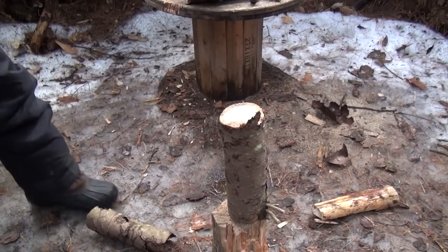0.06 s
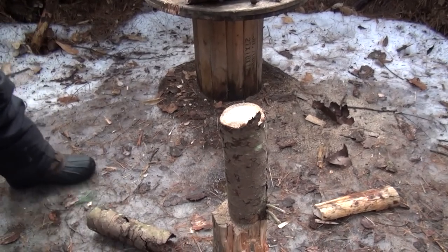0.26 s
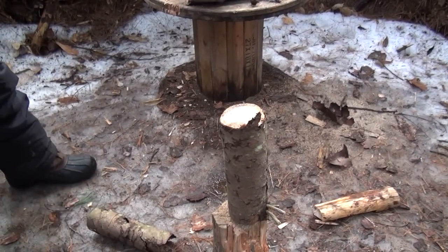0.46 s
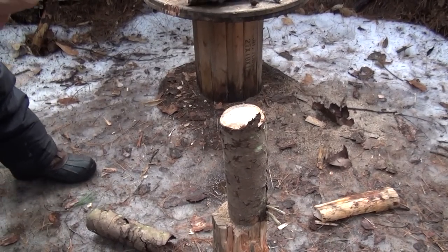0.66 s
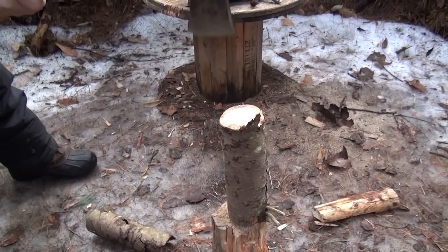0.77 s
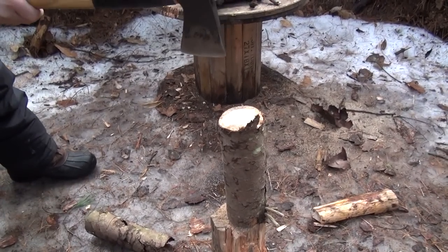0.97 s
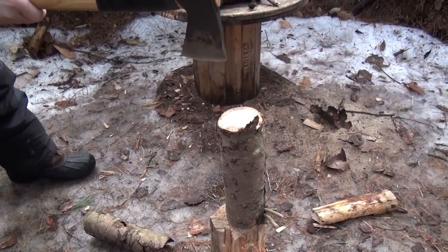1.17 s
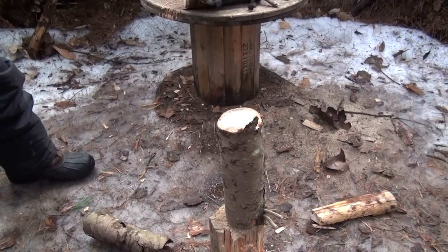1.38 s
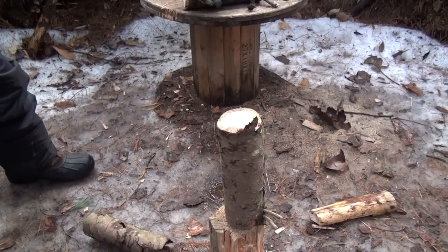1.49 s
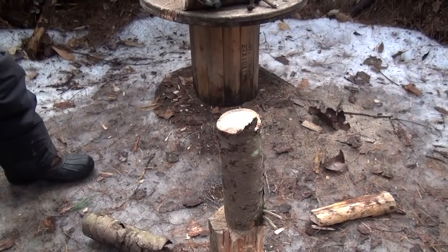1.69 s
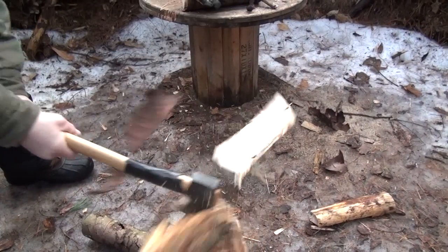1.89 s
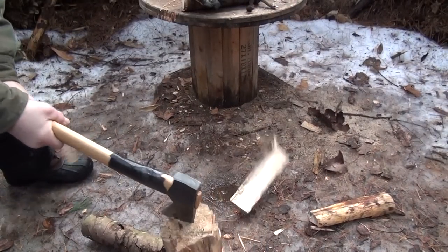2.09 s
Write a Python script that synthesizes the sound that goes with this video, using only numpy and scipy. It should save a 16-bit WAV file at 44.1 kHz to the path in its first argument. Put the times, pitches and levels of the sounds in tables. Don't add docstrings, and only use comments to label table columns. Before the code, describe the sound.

An axe splits a small log with one sharp woody crack after boots shuffle on gritty ground

```python
import sys
import numpy as np
from scipy import signal
from scipy.io import wavfile

SR = 44100
rng = np.random.default_rng(int(sys.argv[2]) if len(sys.argv) > 2 else 0)


def generate_wav(sig):
    pcm = np.round(np.clip(np.atleast_2d(sig).T, -1, 1) * 32767).astype(np.int16)
    wavfile.write(sys.argv[1], SR, pcm)


def linear_from_db(decibels):
    return 10 ** (np.asarray(decibels, float) / 20)


N = 94770
T = np.arange(N) / SR

# frequency in Hz, density in dB per Hz.
GRIT_COLOUR = [(88, -17.5), (150, -13), (649, -7), (900, -8), (1140, -5.5), (2310, -10.5), (8800, -13.5),
               (10800, -19.5), (16000, -21)]


def rms_one(x):
    return x / np.sqrt(np.mean(x ** 2) + 1e-20)


def at_hz(points, hz):
    f, db = np.transpose(points)
    return np.interp(np.log(hz), np.log(f), db) - 12 * np.log2(np.maximum(f[0] / hz, 1))


def drift(rate_hz):
    r = np.exp(-2 * np.pi * rate_hz * 40 / SR)
    slow = signal.lfilter([1], [1, -2 * r, r * r], rng.standard_normal(N // 40 + 2002))[2000:]
    return np.interp(np.arange(N) / 40, np.arange(len(slow)), rms_one(slow))


def bandpass(x, low_hz, high_hz, order=2):
    return signal.sosfilt(signal.butter(order, [low_hz, high_hz], "band", fs=SR, output="sos"), x)


def ring(clicks, hz, t60):
    r = linear_from_db(-60 / (t60 * SR))
    w = 2 * np.pi * hz / SR
    return signal.lfilter([0, np.sin(w)], [1, -2 * r * np.cos(w), r * r], clicks + 1e-18)


def grains(per_s, spread_db, smooth):
    sizes = linear_from_db(spread_db * np.minimum(rng.exponential(1, N), 5)) * rng.choice([-1, 1], N)
    clicks = rms_one(sizes * (rng.random(N) < per_s / SR))
    return rms_one(clicks + smooth * rng.standard_normal(N))


def texture(spectrum, level, tilt_db, patchy_db, *grain):
    sources = [grains(*grain), grains(*grain)]
    both, own = drift(33), drift(16)
    out, power = 0, 0
    for k, hz in enumerate(30 * 2 ** np.arange(0, 9.1, 1 / 3)):
        gain = linear_from_db(at_hz(spectrum, hz))
        power += gain ** 2 * hz * .25 / (SR / 2)
        own = np.roll(own, 3301)
        flicker_db = patchy_db * (.4 * both + 1.33 * own)
        driven = sources[k % 2] * level * linear_from_db(tilt_db * np.log2(hz / 2000) + flicker_db)
        out = out + gain * bandpass(driven, hz / 1.13, hz * 1.13)
    return out / np.sqrt(power)


def strokes(rows, rise_db, fall_db_per_s):
    brightens = 0.054
    level, tilt = np.full(N, 1e-9), np.zeros(N)
    for start, rise, hold, db, bright in rows:
        swell_db = -rise_db * np.clip(1 - (T - start) / rise, 0, 1)
        shape_db = swell_db - fall_db_per_s * np.maximum(T - start - rise - hold, 0)
        gain = linear_from_db(db + shape_db) * np.clip((T - start) / .001, 0, 1)
        level = level + gain
        tilt = tilt + gain * (bright + brightens * np.maximum(shape_db, -30))
    return level, tilt / level


def hits(rows, crack_db, partners, rise_cycles, rough):
    out = np.zeros(N + SR)
    size = SR // 2
    t = np.arange(size) / SR
    draws, noise = rng.random((len(rows), 6)), rng.standard_normal((len(rows), 600))
    for (start, db, hz, t60), d, puff in zip(rows, draws, noise):
        steps = np.arange(len(puff))
        wobble = rough * np.interp(t * hz / 1.3, steps, puff)
        uneven_db = 4.0 * np.interp(t * hz / 1.5, steps, rough * puff[::-1])
        hit = np.sin(2 * np.pi * hz * t + wobble - wobble[0]) * linear_from_db(-60 * t / t60 + uneven_db)
        for ratio, share in zip(0.52 + 1.13 * d[:3], d[3:]):
            partner = np.sin(2 * np.pi * min(hz * ratio, 12000) * t)
            hit += partners * share * partner * linear_from_db(-120 * t / t60)
        crack = bandpass(puff, hz / 2.5, min(hz * 3.5, 14000))
        hit[:600] += linear_from_db(crack_db) * crack * np.exp(-t[:600] * hz / 1.4)
        i = int(start * SR)
        out[i:i + size] += linear_from_db(db) * hit * np.clip(t * hz / rise_cycles, 0, 1)
    return out[:N]


def scatter(x, t60, dull_hz):
    t = np.arange(int(.3 * SR)) / SR
    noise = signal.lfilter([1], [1, -np.exp(-2 * np.pi * dull_hz / SR)], rng.standard_normal(len(t)))
    tail = noise * linear_from_db(-60 * t / t60)
    return signal.fftconvolve(x, tail / np.sqrt(np.sum(tail ** 2)))[:N]


def air():
    # frequency in Hz, density in dB per Hz.
    air_colour = [(15, -53), (25, 7.5), (87, -4), (166, -10), (911, -8), (1040, -14), (1130, -5),
                  (1520, -10.5), (16000, -26)]
    mid, side = (texture(air_colour, linear_from_db(-64), 0, 0.31, 3800, 0.76, 1.0) for _ in range(2))
    whine = linear_from_db(-87) * np.sin(2 * np.pi * 13727 * T)
    return mid + whine, linear_from_db(-13) * side


def boots():
    # start, rise and hold in seconds, level in dB, brightness in dB per octave.
    scuffs = [(-.02, 0.048, 0.045, -50, -1.5), (.08, 0.02, 0.042, -73, 10), (.39, 0.015, 0.023, -67, -1),
              (-.01, 0.049, 0.43, -59, -1.4), (.59, 0.03, 0.053, -62, -0.5), (.222, 0.05, 0.034, -48, -1.4),
              (.372, 0.04, 0.013, -52, -2.4), (.487, 0.011, 0.013, -46, -3.5),
              (.51, 0.04, 0.023, -39, -1.3), (.676, 0.018, 0.039, -47.5, -1),
              (.76, 0.029, 0.058, -57, -1.2), (.86, 0.027, 0.081, -67, -2)]
    level, tilt = strokes(scuffs, 7, 578)
    return texture(GRIT_COLOUR, level, tilt, 1.68, 2000, 3.6, 0.95)


def ticks():
    # start in seconds, peak in dB, pitch in Hz, t60 in seconds.
    small_hits = [(.0288, -41, 1190, 0.0046), (.0433, -36.5, 3220, 0.0047), (.1296, -43, 1550, 0.028),
                  (.4255, -27.5, 1500, 0.0045), (.4885, -65, 1190, .02), (.6843, -43, 7500, 0.0054),
                  (.8175, -46, 2400, 0.029), (.84, -42.5, 2250, 0.019), (.954, -50, 2830, .008),
                  (1.0021, -46.5, 2080, 0.016), (1.007, -41, 1510, 0.0035), (1.077, -52.5, 2740, 0.015),
                  (1.3294, -43.5, 1990, 0.039), (1.3297, -38, 660, 0.012), (1.3296, -52, 4350, 0.025),
                  (1.4795, -61, 1630, 0.021), (1.623, -36.5, 1040, 0.011), (1.6985, -43, 2630, 0.018)]
    return hits(small_hits, 2.8, 0.89, 0.64, 1.0)


def thuds():
    # start in seconds, peak in dB, pitch in Hz, t60 in seconds.
    weights = [(.043, -33, 175, 0.024), (.076, -37.5, 535, 0.034), (.224, -31.5, 124, 0.05),
               (.252, -32, 296, 0.044), (.281, -28.5, 735, 0.014), (.427, -39, 260, 0.044),
               (.5105, -9, 174.6, 0.023), (.545, -33.5, 127, 0.089), (1.808, -16, 563, 0.038),
               (1.8115, -16.5, 404, 0.027), (1.8495, -27.5, 120.4, 0.15), (1.85, -31.5, 184.4, 0.16),
               (1.995, -50, 64, 0.26), (1.812, -24.5, 152, 0.1), (1.8725, -30, 1993, 0.027),
               (2.065, -37, 1500, 0.038), (1.9, -42, 87.5, 0.14), (2.144, -50, 154, 0.017),
               (2.1395, -41, 948, 0.079)]
    return hits(weights, -30, .15, .8, .3)


def cracks():
    # start in seconds, peak in dB, pitch in Hz, swell and t60 in
    # seconds.
    short_rings = [(1.8165, -25, 507, 0.0013, 0.0053), (1.8195, -17.5, 1500, 0.0053, 0.022),
                   (1.8195, -19.5, 2930, 0.00078, 0.012), (1.824, -14, 1955, 0.0019, .012),
                   (1.824, -19, 2975, .0015, 0.01), (1.828, -28, 960, 0.0013, 0.015),
                   (1.8315, -11.5, 1660, 0.0014, 0.0085), (1.8345, -14.5, 1160, 0.0016, 0.013),
                   (1.8365, -37, 2270, .001, .015), (1.838, -21, 3530, 0.00084, 0.013),
                   (1.8415, -23.5, 346, 0.00067, 0.049), (1.86, -31.5, 2980, 0.0013, 0.016),
                   (2.0605, -36.5, 4650, .001, .012), (2.086, -36.5, 1160, .0006, 0.012),
                   (2.089, -44, 3500, 0.0014, .02), (2.1248, -33.5, 1436, 0.0015, .035),
                   (2.127, -33.5, 2790, 0.0019, 0.019), (2.127, -32.5, 3750, 0.0019, 0.014),
                   (2.142, -39, 3170, .003, 0.026), (1.3294, -47.5, 825, .0006, 0.024),
                   (1.3294, -46, 3480, 0.00049, 0.014), (1.9465, -33, 4900, 0.00015, 0.0092),
                   (1.937, -48, 98.5, .01, 0.14), (1.757, -46, 302, 0.0019, 0.044),
                   (1.757, -51, 704, 0.0022, 0.033), (1.8075, -20.5, 790, 0.0016, .015),
                   (1.8485, -27, 750, 0.0017, 0.016), (1.857, -39, 59.6, 0.019, 0.13),
                   (2.0853, -31.5, 2427, 0.00086, 0.033), (2.062, -40, 2150, 0.0022, .03),
                   (2.1422, -28, 856, 0.00033, 0.024), (.426, -36, 3540, 0.00033, .006),
                   (0.8405, -50, 4200, .0003, .006), (1.0035, -51, 3800, 0.00028, .01),
                   (1.8765, -35, 2000, .003, .012)]
    out = np.zeros(N)
    for start, db, hz, swell, t60 in short_rings:
        t = np.maximum(T - start, 0)
        envelope = linear_from_db(db - 60 * np.maximum(t - swell, 0) / t60) * np.minimum(t / swell, 1)
        out += envelope * np.sin(2 * np.pi * hz * t)
    return out


def jacket():
    # start, rise and hold in seconds, level in dB, brightness in dB per octave.
    swing = [
        (1.357, 0.13, 0.084, -56.5, -3.5),
        (1.58, 0.031, 0.097, -58, -1.1),
        (1.514, 0.022, 0.045, -65, 1.5),
        (1.681, 0.1, 0.089, -51.5, -2.5),
    ]
    # frequency in Hz, density in dB per Hz.
    cloth_colour = [(59, -52), (100, -20), (210, -11), (854, -6), (970, -6), (2860, -8), (10200, -17),
                    (13800, -17), (16000, -16)]
    whoosh = [
        (1.44, 0.066, 0.063, -60, 0),
    ]
    level, tilt = strokes(swing, 12.3, 195)
    cloth = texture(cloth_colour, level, tilt, 1.2, 3000, 3.0, 1.24)
    hollow = rms_one(ring(rng.standard_normal(N), 750, 0.0086))
    return cloth + hollow * strokes(whoosh, 9.8, 300)[0]


def split():
    # start, rise and hold in seconds, level in dB, brightness in dB per octave.
    tear_strokes = [
        (1.8066, 0.00018, 0.0049, -22.5, -0.8),
        (1.815, 0.0085, 0.015, -24, -1.5),
        (1.845, 0.0035, 0.03, -46.5, -0.5),
        (1.885, 0.004, 0.06, -48.5, -1.8),
        (1.95, 0.0092, 0.11, -56.5, -2),
    ]
    # frequency in Hz, density in dB per Hz.
    fibre_colour = [(120, -6), (200, -11), (612, -4.5), (806, -5), (1560, -2.5), (2470, -3.5), (3560, -5.5),
                    (8420, -11), (16000, -19)]
    # frequency in Hz, level in dB.
    log_modes = [(355, 1), (600, -5), (980, -9), (1160, 6), (1420, -4), (1600, 5), (1790, 3.5), (1990, 8),
                 (2600, -16)]
    level, tilt = strokes(tear_strokes, 8, 700)
    tear = texture(fibre_colour, level, tilt, 0.48, 9000, 1.4, 0.94)
    snaps = grains(1500, 5.2, 0.11) * level ** 1.55
    body = 0
    for hz, db in log_modes:
        caught = snaps * (rng.random(N) < .6)
        body = body + linear_from_db(db) * ring(caught, hz, 0.011)
    return tear + linear_from_db(-14) * body * np.sqrt(np.mean(tear ** 2) / np.mean(body ** 2))


def knocks():
    # start in seconds, peak in dB, first pitch in Hz, t60 in seconds.
    blows = [
        (1.848, -13.5, 760, .013),
        (2.1376, -15.5, 750, .026),
    ]
    sag_s = .0009
    out = np.zeros(N)
    for start, db, hz, t60 in blows:
        t = np.maximum(T - start, 0)
        out += linear_from_db(db - 60 * t / t60) * np.sin(2 * np.pi * hz * sag_s * np.log1p(t / sag_s))
    return out


def debris():
    # start in seconds, peak in dB, pitch in Hz, t60 in seconds.
    chips = [(1.879, -23, 2640, 0.0045), (1.932, -35.5, 4140, 0.0024), (1.9465, -27, 7200, 0.0064),
             (1.949, -34, 7700, 0.01), (1.9585, -23, 4600, 0.0014), (1.9598, -23, 9230, 0.0052),
             (1.9752, -39.5, 8460, 0.029), (1.998, -37.5, 1920, 0.023), (2.0542, -28, 2030, 0.022),
             (2.0543, -35, 4280, 0.021), (2.0762, -33, 5360, 0.017), (2.0765, -33, 2420, 0.019),
             (2.0855, -31, 2450, 0.008), (2.0856, -29, 5700, 0.0093), (2.096, -41, 2280, 0.017),
             (2.1305, -38, 6230, 0.017), (2.1425, -32.5, 1490, 0.022), (2.135, -28.5, 7400, 0.0091),
             (2.1352, -23.5, 1540, 0.0047)]
    # start, rise and hold in seconds, level in dB, brightness in dB per octave.
    skids = [
        (2.053, 0.0024, .02, -58, -2.5),
        (2.0755, 0.0016, 0.016, -47, 0.5),
        (2.126, 0.0066, .024, -37, 0.5),
    ]
    level, tilt = strokes(skids, 6.4, 450)
    skidding = texture(GRIT_COLOUR, level, tilt, 0.87, 2500, 6.6, 0.72)
    return hits(chips, -0.0089, 0.5, 0.65, 0.98) + skidding


def scene():
    rub = boots() + jacket()
    sharp = split() + cracks() + debris() + ticks()
    dull = thuds() + knocks()
    mid = rub + sharp + dull
    mid = mid + linear_from_db(-19.5) * scatter(mid, 0.12, 4400)
    hum, wide = air()
    narrow = linear_from_db(-17.5) * scatter(rub, 0.0099, 20000) + wide
    narrow = narrow - .55 * bandpass(narrow, 4000, 11000, order=1)
    rumble = signal.sosfilt(signal.butter(2, 70, fs=SR, output="sos"), dull)
    side = narrow + linear_from_db(-18.5) * scatter(sharp, 0.023, 9300) + linear_from_db(-21) * dull + linear_from_db(-1.5) * rumble
    return mid + hum + side * [[1], [-1]]


def top_cut(x):
    return signal.sosfilt(signal.butter(12, 16820, fs=SR, output="sos"), x)


def record(dry):
    x = signal.sosfilt(signal.butter(2, 70, "high", fs=SR, output="sos"), dry)
    x = signal.sosfilt(signal.cheby2(8, 30, 16200, fs=SR, output="sos"), x)
    return top_cut(x)


dry = scene()
out = record(dry)
generate_wav(out)
```